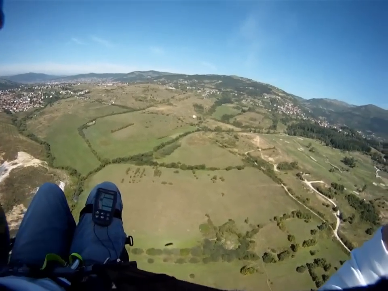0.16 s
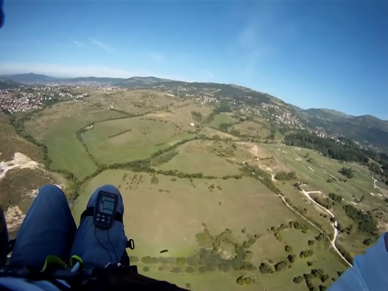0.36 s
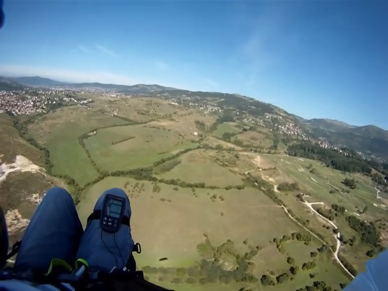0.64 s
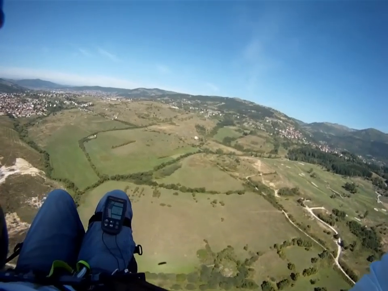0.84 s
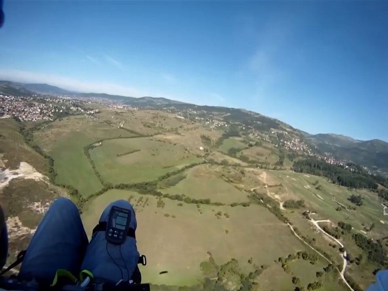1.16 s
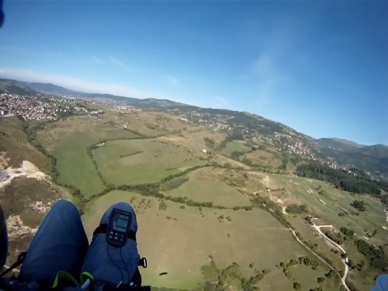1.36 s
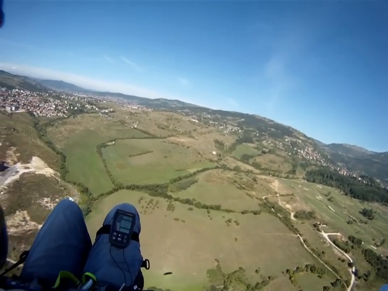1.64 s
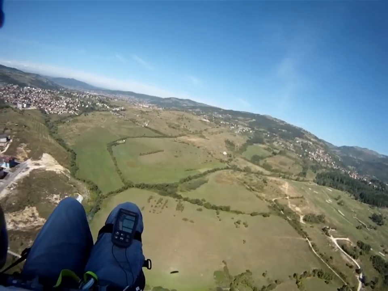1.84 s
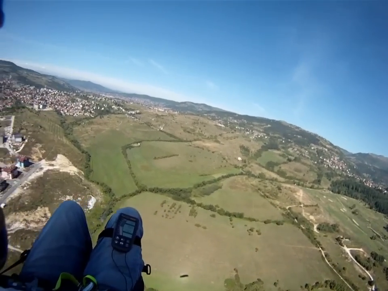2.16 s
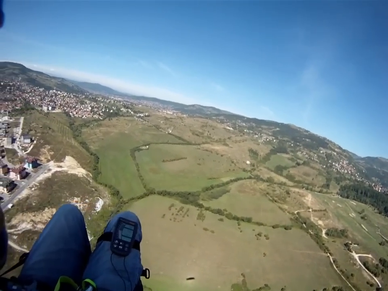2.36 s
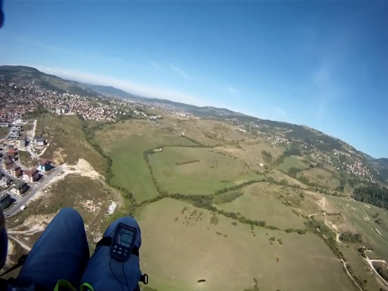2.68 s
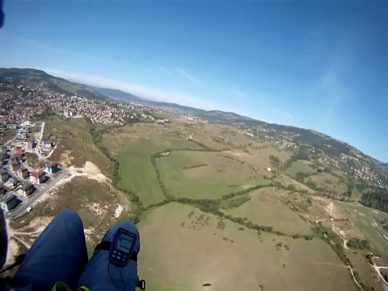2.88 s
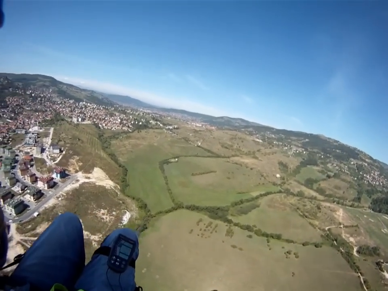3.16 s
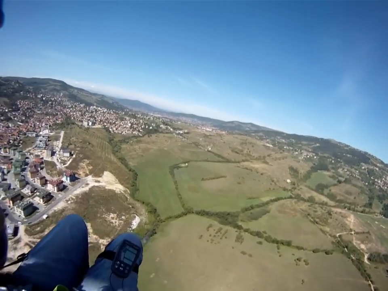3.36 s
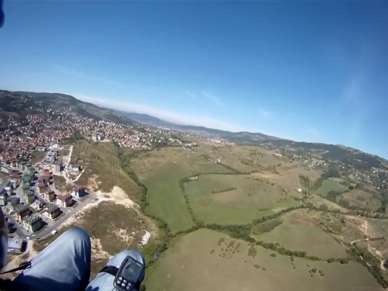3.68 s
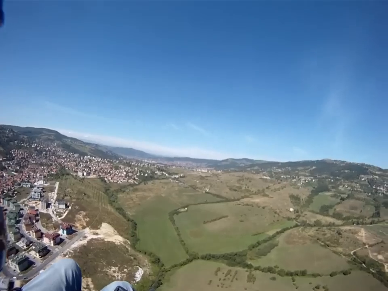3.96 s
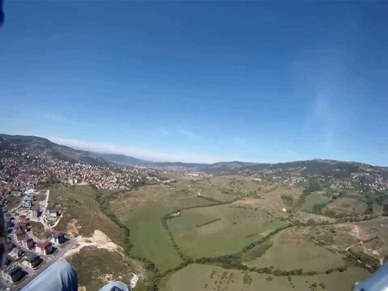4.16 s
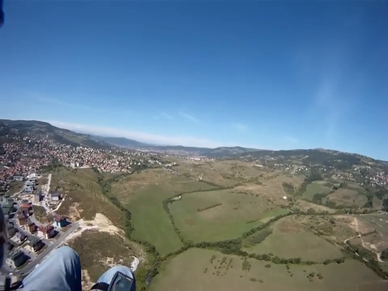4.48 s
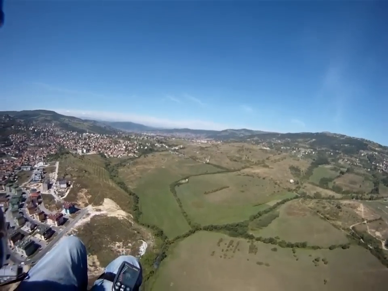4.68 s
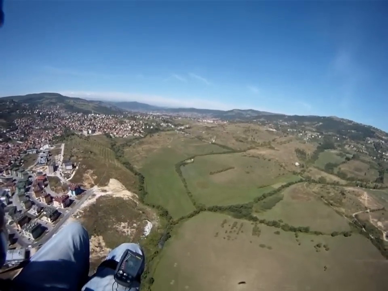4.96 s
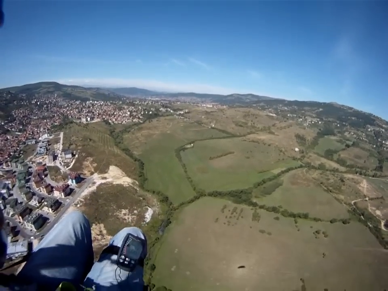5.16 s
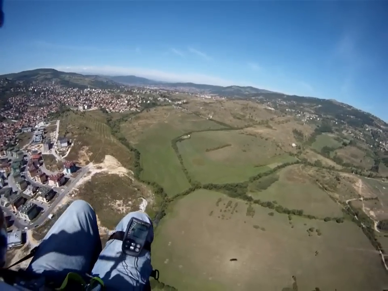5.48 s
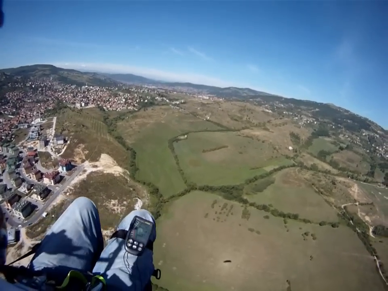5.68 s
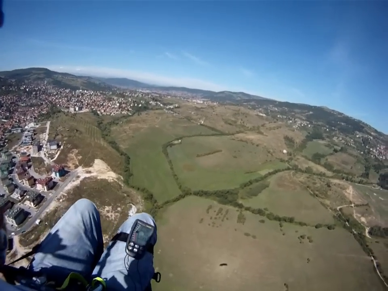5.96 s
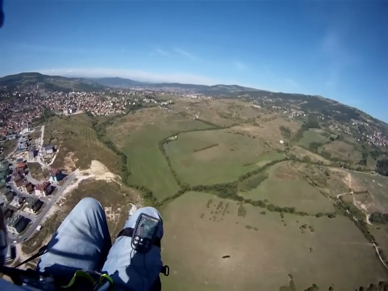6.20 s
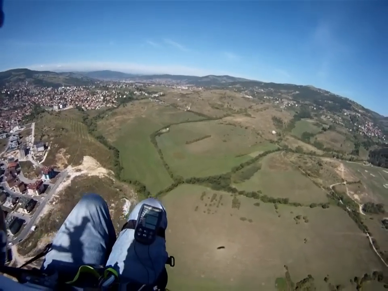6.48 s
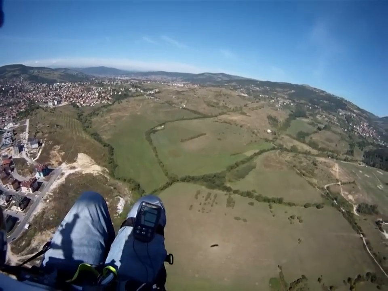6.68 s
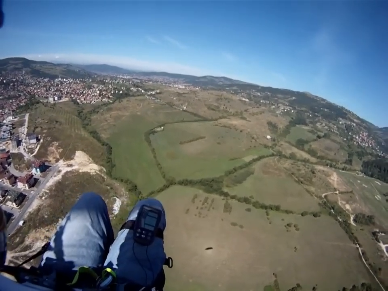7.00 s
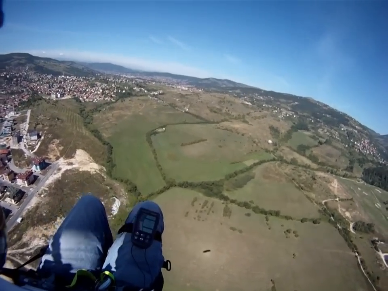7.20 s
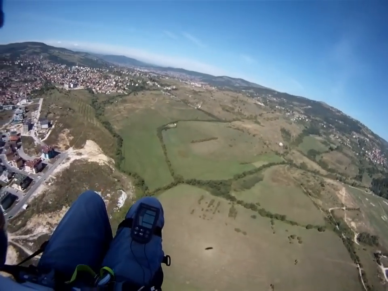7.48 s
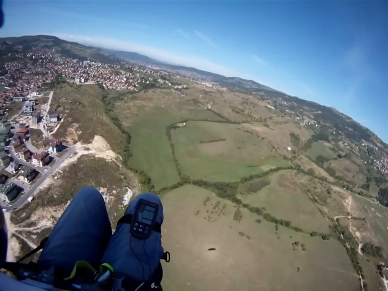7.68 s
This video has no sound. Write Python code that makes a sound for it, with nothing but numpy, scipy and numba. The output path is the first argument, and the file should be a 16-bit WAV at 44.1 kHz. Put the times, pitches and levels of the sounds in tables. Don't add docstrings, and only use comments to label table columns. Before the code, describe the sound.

A small two-stroke engine behind a pilot drones steadily in flight, buzzing and rattling, with propeller hum, wind rumble and two early buzzing thuds.

```python
import sys
import numpy as np
from scipy import signal
from scipy.io import wavfile
from scipy.ndimage import uniform_filter1d
from numba import njit

SR = 44100
rng = np.random.default_rng(int(sys.argv[2]) if len(sys.argv) > 2 else 0)


def rack_gain(trim_db):
    fader = np.asarray(trim_db, float)
    return 10 ** (fader / 20)


def log_audio(samples):
    frames = np.atleast_2d(samples).T
    limited = np.clip(frames, -1, 1)
    pcm = np.round(limited * 32767).astype(np.int16)
    wavfile.write(sys.argv[1], SR, pcm)


N = 345744


@njit
def resonance(x, hz, width):
    y, band, low = np.empty(len(x)), 0., 0.
    g, k = np.tan(np.pi * hz / SR), width / hz
    for i in range(len(x)):
        v = (band + g * (x[i] - low)) / (1 + g * (g + k))
        band = 2 * v - band
        low = low + 2 * g * v
        y[i] = k * v
    return y


def steep_resonance(x, hz, width):
    return resonance(resonance(x, hz, width), hz, width)


def level(x, db):
    return x * rack_gain(db) / np.sqrt(np.mean(x ** 2))


def curves(table):
    seconds, *columns = np.transpose(table)
    return [np.interp(np.arange(N) / SR, seconds, c) for c in columns]


def ramp(start, length):
    return np.sin(np.clip((np.arange(N) / SR - start) / length, 0, 1) * np.pi / 2) ** 2


def walk(rate):
    k = int(SR / rate)
    steps = np.repeat(rng.standard_normal(N // k + 1), k)
    return 1.5 * uniform_filter1d(uniform_filter1d(steps, k), k)[:N]


def strength(turns, moment, chance, scatter_db):
    return rack_gain(scatter_db * chance)[np.floor(turns - moment + 1.5).astype(int)]


def facing(hz, cage_db, muffler_db):
    if 860 < hz < 1100:
        return cage_db
    return muffler_db if 1350 < hz < 1800 else 0


# time in seconds, firings per second.
SPEED = [(0.15, 100.97), (0.51, 100.69), (1.02, 101.41), (1.45, 101.83), (1.85, 101.75), (2.65, 101.51),
         (3.45, 100.87), (3.85, 101.1), (4.25, 101.65), (4.65, 101.97), (5.05, 101.86), (5.45, 101.95),
         (5.85, 101.71), (6.25, 101.69), (7.05, 102.12), (7.5, 102.16)]


def rotation():
    turns = -.19 + np.cumsum(curves(SPEED)[0]) / SR
    blades = -.29 + 1.16055 * turns
    return turns, blades


# time in seconds, turn as gain of the hum in dB.
TURN = [(0, .6), (.85, -0.9), (1.2, -2), (1.6, -.5), (3, 0), (3.7, 1), (4.45, 2), (5.2, 1), (5.6, .5),
        (6.5, 0), (7.3, -0.5), (7.84, -.5)]
# time in seconds, swell in dB, length in seconds.
CAGE_RINGS = [
    (1.205, 3, 0.83),
    (3.703, 5, 0.6),
    (4.594, 5, 0.98),
    (6.55, 4.5, 1),
]


def pose():
    turn_db = curves(TURN)[0]
    swells = [db * ramp(s - length, length) * (1 - ramp(s, length)) for s, db, length in CAGE_RINGS]
    cage_db = -2.8 + sum(swells)
    rattle_db = -0.44 * turn_db
    muffler_db = -0.35 - 3.3 * turn_db
    return turn_db, rattle_db, cage_db, muffler_db


# multiple of the firing rate, level in dB.
FIRING = [(1, 0), (2, -4), (3, -21), (4, -12), (5, -19), (6, -21), (7, -18), (8, -13), (9, -9), (10, -10),
          (11, -22), (12, -20), (13, -16), (14, -13), (15, -13), (16, -8), (17, -12), (18, -18), (19, -14),
          (20, -20), (21, -4), (22, -3), (23, -8), (24, -9), (25, -15), (26, -16), (27, -17), (28, -15),
          (29, -20), (30, -20),
          (32, -15), (33, -19.5), (34, -14.5), (36, -17), (37, -19.5)]
# firing multiple, blade multiple, level in dB rms.
CHOPPED = [(0, 1, -36), (1, 1, -37.5), (1.5, 1, -42.5), (2, 1, -45.5), (2.5, 1, -43.5), (3, 1, -43.5),
           (0, 3, -46.5), (0, 4, -46), (1, 2, -48.5), (1, 3, -63.5), (2, 2, -56), (3, 3, -51),
           (.5, 1, -57.5), (-1, 1, -75), (0, 7, -40), (0, 12, -34), (0, 14, -37.5), (0, 17, -54),
           (0, 18, -30.5), (0, 21, -39.5), (0, 24, -42.5), (0, 9, -40), (0, 11, -49.5), (0, 15, -42.5),
           (0, 16, -35.5)]


def hum(turns, blades, posture, blows):
    hum_db, _, cage_db, muffler_db = posture
    out, uneven = 0, uniform_filter1d(strength(turns, 0.81, blows, 1.4), 60)
    for k, db in FIRING:
        fading = np.clip((k - 2) / 30, .04, .42)
        paths = np.sqrt(1 - fading ** 2) + fading * .7 * (walk(2) + 1j * walk(2))
        if k > 18:
            late = .4 * k + 0.077 * rng.standard_normal()
        else:
            late = rng.random() * (k > 2)
        if k == 1:
            turned = hum_db
        else:
            turned = -np.maximum(hum_db, -.4) * 2.8 * (k < 9) * min(k / 3, 1)
        turned = turned + facing(k * SPEED[0][1], cage_db, muffler_db)
        line = rack_gain(-19.5 + db + turned) * (paths * np.exp(2j * np.pi * (k * turns - late))).real
        out = out + line * (uneven if k > 18 else 1)
    for k, m, db in CHOPPED:
        shade_db = hum_db * 1.1 * (2 < k + m < 7)
        start = rng.random() * (k != 0)
        out = out + rack_gain(db + 4.5 - shade_db) * np.cos(2 * np.pi * (k * turns + m * blades + start))
    return out


# centre in Hz, width in Hz, level in dB rms,
# moment of the burst in the firing cycle (0-1), burst depth.
BODY = [(854.5, 45, -38, .2, 0.62), (989, 140, -30, 0.46, 2.3), (1216, 260, -40, 1, 0.9),
        (1522, 137, -29, 0.73, 0.43), (1740, 76, -35, 0.22, 1.2), (1980, 50, -37.5, 0.5, 0.7),
        (2190, 123, -20.5, 0.37, 1.24), (2490, 160, -23.5, 0.74, 0.98), (2870, 520, -31, 0, 0.12),
        (3036, 69, -39.5, 0.5, 0.81), (3418, 140, -35.5, 0.4, 2.5), (3698, 326, -31, 0.2, 0.79),
        (4025, 100, -45.5, 0, 0.76), (4904, 360, -39, .25, 1.5)]


def rattle(turns, blades, posture, blows):
    _, rattle_db, cage_db, muffler_db = posture
    out = 0
    for hz, width, db, moment, depth in BODY:
        size = strength(turns, moment, blows, 1.7)
        size = size * strength(turns, moment, rng.standard_normal(1000), 1.4)
        size = size ** (.4 if hz < 1300 else 1)
        pulse = np.exp(max(depth, 0) * 1.3 * np.cos(np.pi * (turns - moment)) ** 4)
        burst = 1 + size * (pulse - 1)
        ring = steep_resonance(burst * rng.standard_normal(N), hz * 1., width * 1.97)
        wander_db = 0.69 * walk(2.78) + 0.49 * walk(11)
        out = out + level(ring, db) * rack_gain(rattle_db + 0.21 * facing(hz, cage_db, muffler_db) + wander_db)
    belt_hz = 10.9
    belt = np.cos(2 * np.pi * belt_hz * np.arange(N) / SR + 2.5 * walk(2.6))
    return out * rack_gain(.8 * np.cos(2 * np.pi * blades) + .9 * belt)


# frequency in Hz, level in dB per Hz.
WIND = [(15, -31), (28, -10), (42, -26), (57, 4.5), (80, -2.5), (150, -8.5), (300, -9), (450, -12),
        (620, 6.5), (780, -23.5), (1200, -11.5), (3000, -5.5), (4500, -7.5), (5900, -40.5)]
# time in seconds, level in dB over the calm.
GUSTS = [
    (.3, 5),
    (.63, 12),
    (0.962, 12),
    (3.54, 3),
    (4.45, 7),
    (5.68, -19),
    (7.13, 5),
]


def wind(hum_db):
    out, gust = 0, walk(1.7)
    hzs, dbs = np.transpose(WIND)
    rise_s, fall_s = .17, 0.5
    buffets = [db * ramp(s - rise_s, rise_s) * (1 - ramp(s, fall_s)) for s, db in GUSTS]
    rumble_db = np.max(buffets, axis=0)
    rumble_db = rumble_db - rumble_db.mean()
    for hz in 14.3 * 2 ** np.arange(0, 9, .4):
        db = np.interp(np.log(hz), np.log(hzs), dbs) + .5 * gust + 0.65 * walk(8.0)
        if hz < 85:
            db = db + rumble_db * (1 if 42 < hz < 80 else .3)
        else:
            db = db - hum_db * 0.93 * (hz < 800)
        out = out + rack_gain(db) * steep_resonance(rng.standard_normal(N), hz, hz * 0.67)
    return level(out, -28)


# time in seconds, peak level in dB, ringing frequency in Hz.
PINGS = [(0.2433, -1.5, 2150), (0.849, 3, 2200), (1.8208, -2, 2420), (1.9979, -1.5, 2220),
         (2.0173, -3.5, 2260), (2.1266, -1.5, 2270), (2.3521, -1.5, 2250), (2.815, -4, 2260),
         (3.3982, 0.5, 2270), (3.903, -3, 2260), (3.9134, 4.5, 2220), (4.0612, 0.5, 2200),
         (4.0806, 0.5, 2200), (4.2178, 5, 2190), (4.6014, 2, 2370), (4.8374, 0.5, 2160),
         (4.9447, 3.5, 2220), (5.151, -0.5, 2210), (5.3178, 6, 2230), (5.6915, -1.5, 2170),
         (6.114, 1.5, 2190), (6.4777, -4.5, 2210), (6.7341, -4, 2260), (7.2913, 4, 2210),
         (7.634, 5.5, 2240)]


def pings():
    out, t = np.zeros(N), np.arange(-300, 400) / SR
    swell_s, die_s = .0017, .0018
    shape = np.exp(-(t / np.where(t < 0, swell_s, die_s)) ** 2)
    for s, db, hz in PINGS:
        at = int((s + 0.001868) * SR)
        out[at - 300:at + 400] += rack_gain(db - 4.0) * shape * np.sin(2 * np.pi * hz * t)
    return out


LIFT_S = .1
# start in seconds, hold in seconds, shake in dB,
# blade lag in cycles, bounce.
TOUCHES = [
    (.287, 0.0077, -12, .27, 2.9),
    (0.303, 0.13, -7.5, 0.25, 1.25),
    (0.595, 0.015, -26, 0.37, 2.8),
    (.893, 0.018, -19.5, .1, 5.7),
    (.922, 0.1, -12.5, 0.12, 0.56),
]


def touch(turns, blades):
    out, loose = 0, rack_gain(3 * walk(110))
    grit = resonance(rng.standard_normal(N), 220.0, 290.0)
    press_s, sag_db_per_s = 0.012, 18
    for s, hold, shake_db, lag, bounce in TOUCHES:
        lift = 1 - ramp(s + hold, min(LIFT_S, 1.5 * hold))
        sag = rack_gain(-sag_db_per_s * np.clip(np.arange(N) / SR - s, 0, hold))
        grip = ramp(s, press_s) * lift * sag
        bounce = bounce * np.sqrt(lift)
        crank, blade = 2 * np.pi * turns, 2 * np.pi * (blades + lag)
        shake = np.cos(crank) + 0.75 * np.cos(blade)
        double = .85 * np.cos(crank + blade + 1.3)
        double = double - .08 * np.cos(2 * crank + 1.3) - .08 * np.cos(2 * blade + 1.3)
        double = double - 0.16 * np.cos(2 * crank + blade) - 0.077 * np.cos(crank + 2 * blade)
        both = shake + np.clip(bounce, 0, 2) * double
        clack = resonance(np.maximum(both - .9, 0) ** 2 * loose, 370.0, 700.)
        scrape = 1.4 * bounce * grit
        out = out + rack_gain(shake_db - 3.5) * grip * (both + .55 * clack + scrape)
    return out


def air_dip():
    dip_s, recover_s = .045, 0.26
    dips = [ramp(s, dip_s) * (1 - ramp(s + hold + LIFT_S, recover_s)) for s, hold, *_ in TOUCHES]
    return rack_gain(-5.5 * np.max(dips, axis=0))


def scene():
    turns, blades = rotation()
    posture = pose()
    blows = np.clip(rng.standard_normal(1000), -3, 1.5)
    engine = hum(turns, blades, posture, blows) + rattle(turns, blades, posture, blows) + pings()
    through_air = air_dip() * (engine + wind(posture[0]))
    return (through_air + touch(turns, blades))[None]


@njit
def duck(x, top, fall, rise, lag):
    y, gain = np.zeros(len(x)), .85
    for i in range(len(x)):
        y[i] = x[i] * gain
        gain = gain * fall if abs(y[i - lag]) > top else min(gain * rise, 1.)
    return y


def hold_samples(x):
    rate, hold = 12000, 4
    coarse = signal.resample_poly(x, rate // 300, SR // 300)
    return signal.resample_poly(np.repeat(coarse, hold), SR // 300, hold * rate // 300)[:N]


def band_limit(x):
    return signal.sosfilt(signal.butter(12, 16200, fs=SR, output="sos"), x)


def record(dry):
    loud = duck(dry[0] * rack_gain(3.5), 0.57, rack_gain(-.13), rack_gain(45 / SR), SR // 2000)
    loud = loud / (1 + (np.abs(loud) / .9) ** 6) ** (1 / 6)
    treble_cut = signal.ellip(8, .1, 45, 15450, fs=SR, output="sos")
    mix = signal.sosfiltfilt(treble_cut, hold_samples(loud))
    return band_limit(mix[None])


dry = scene()
out = record(dry)
log_audio(out)
```